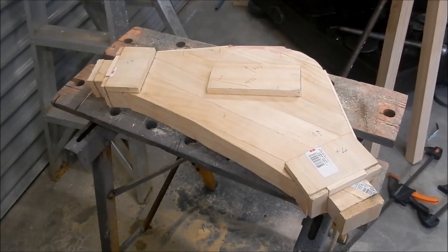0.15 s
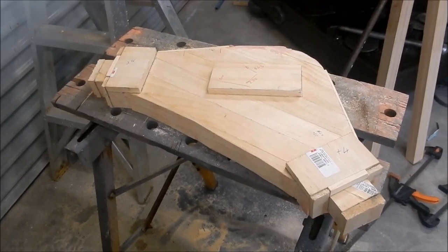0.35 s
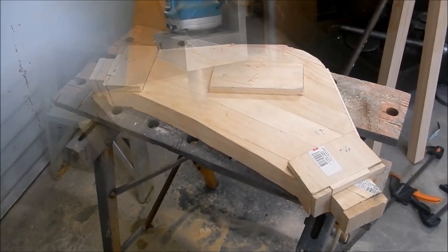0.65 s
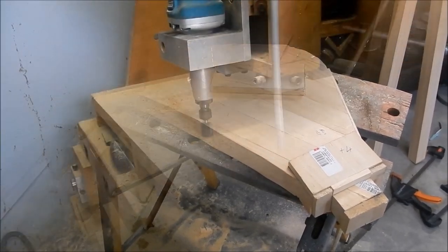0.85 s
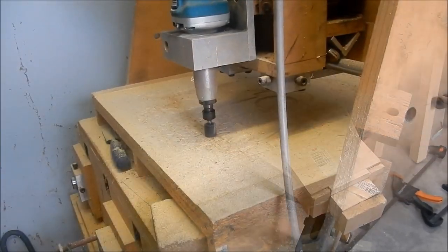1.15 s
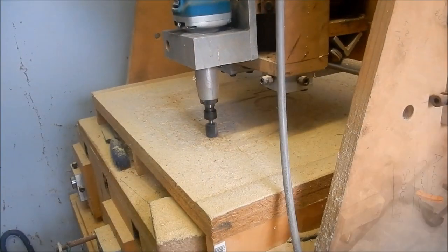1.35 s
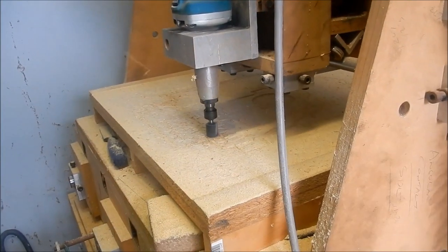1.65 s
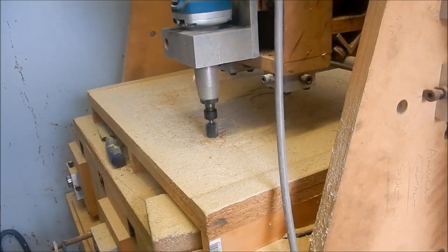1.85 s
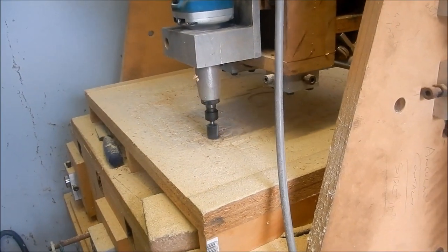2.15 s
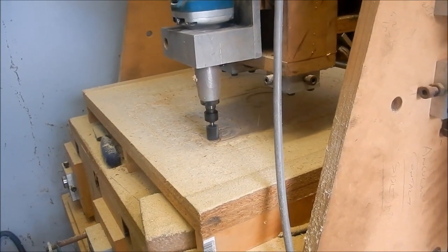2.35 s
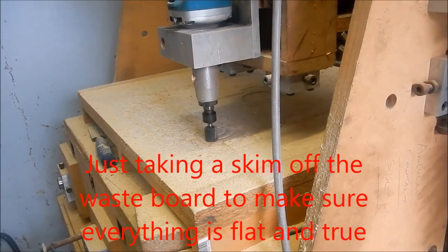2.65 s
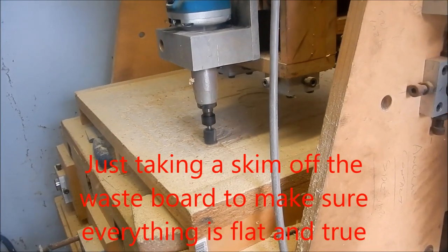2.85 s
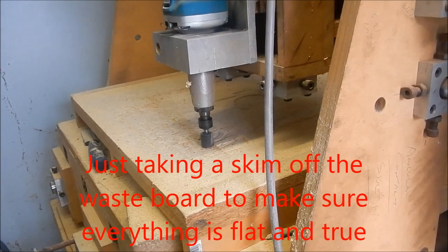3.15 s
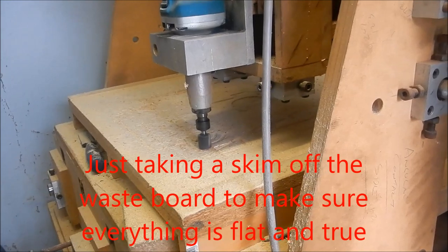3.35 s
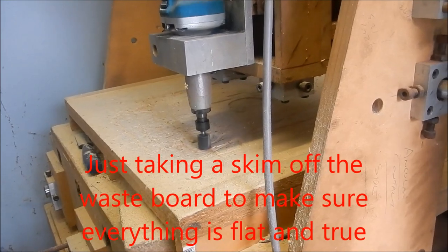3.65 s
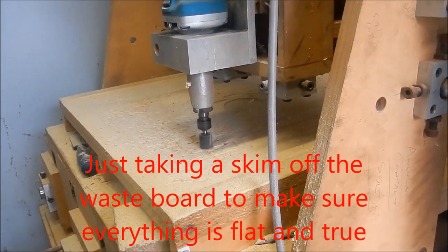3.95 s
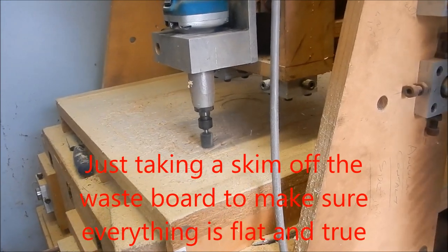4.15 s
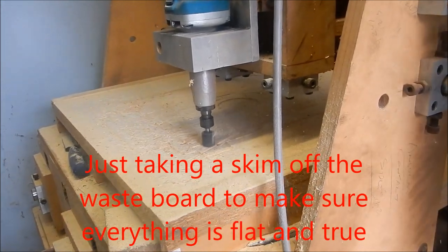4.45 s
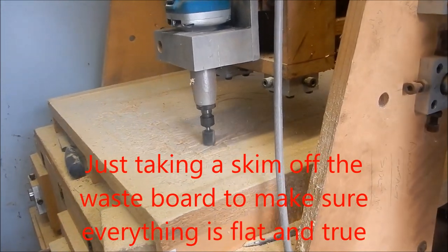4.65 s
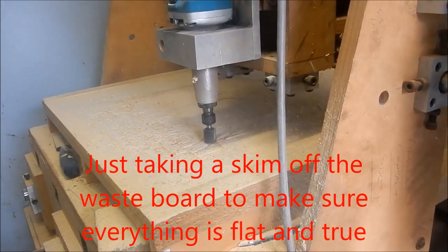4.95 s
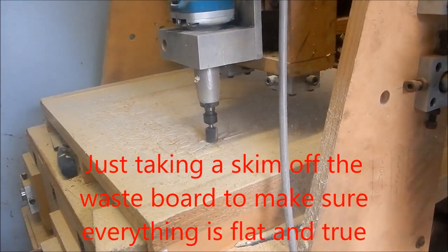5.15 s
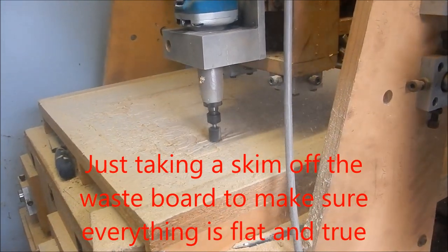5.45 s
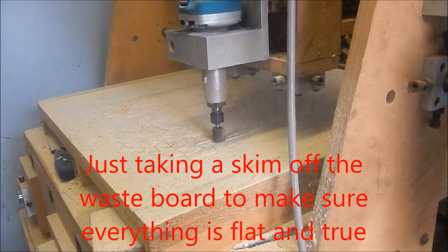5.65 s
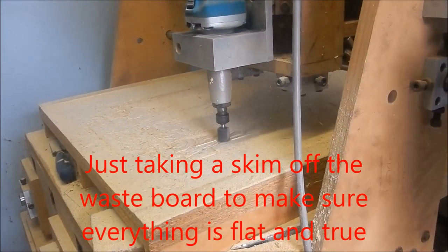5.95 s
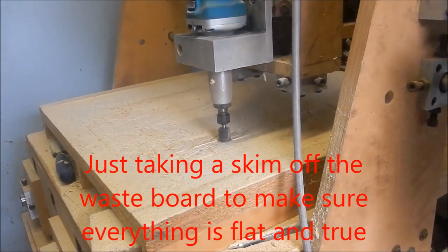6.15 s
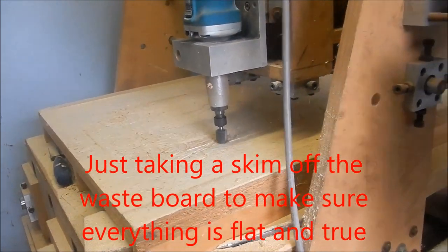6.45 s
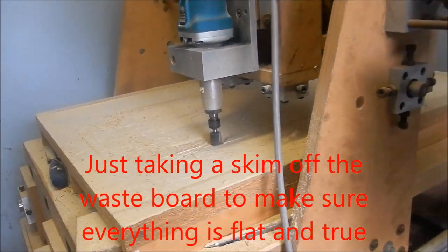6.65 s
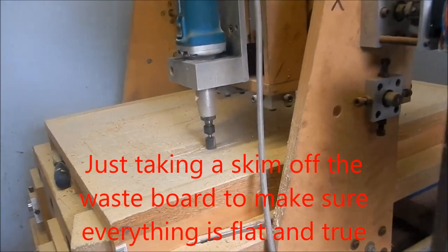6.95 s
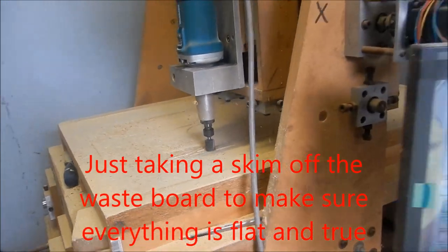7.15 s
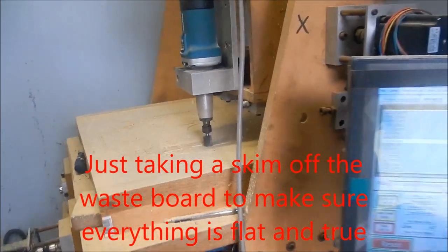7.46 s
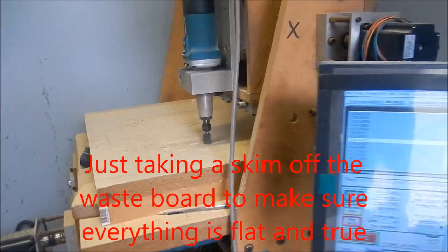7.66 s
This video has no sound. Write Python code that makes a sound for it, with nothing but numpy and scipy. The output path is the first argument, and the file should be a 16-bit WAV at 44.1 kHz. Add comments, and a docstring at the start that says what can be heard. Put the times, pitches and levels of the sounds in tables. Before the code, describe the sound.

Dull workshop noise with a faint whir opens the scene and is gone by about 2 seconds. At about 0.2 seconds a running router cuts in abruptly, close by, and continues to the end. Its bright, high whine holds a nearly constant pitch while the bit skims a wooden board, giving a rasp and a hiss of chips. Many very short squeals flicker at different pitches, thickest and loudest in the first 1.5 seconds; the cut becomes lighter by about 2.5 seconds. Underneath, a lower drone swells, dips and shifts between left and right, with a soft rush from the cooling fan. Around 3.2 to 3.7 seconds the machine's positioning motors faintly glide down and back up with a slight rumble, then leave a quiet hum. The drone swells briefly near 3.7 and 7.7 seconds, and the router is still cutting at the end, near 8 seconds.

```python
"""A trim router on a home-built CNC gantry skims a wooden board in a small workshop. Its two-flute bit whines,
squeals on hard fibres and rasps off chips; imbalance and flute strikes make the board drone, while bearings and
fan run along. Half-way the stepper motors slow down, step over and hum along the next pass. A dull noise with a
faint whir opens the sound and fades out by about 2 s."""
import sys
import numpy as np
from scipy import signal
from scipy.io import wavfile

SR = 44100
rng = np.random.default_rng(int(sys.argv[2]) if len(sys.argv) > 2 else 0)


def transcribe(u):
    """Save the signal u as a 16-bit wav file named by the first command-line argument.

    u: samples, shape (n,) or (channels, n), limited to [-1, 1]; the rate is SR.
    q: integer samples, one column per channel.
    """
    v = np.clip(np.atleast_2d(u).T, -1, 1)
    q = np.round(v * 32767).astype(np.int16)
    wavfile.write(sys.argv[1], SR, q)


N = 344862

# spindle speed, sagging under load: (time [s], speed [turns/s])
SPINDLE_SPEED = [(0.25, 389.5), (1.01, 387.9), (1.24, 391.2), (1.45, 388.2), (1.87, 392.8), (2.31, 387.4),
                 (2.52, 391.9), (2.71, 390.3), (2.84, 385.0), (3.3, 394.0), (3.84, 385.1), (4.16, 388.4),
                 (4.27, 385.3), (5.06, 387.5), (5.19, 390.9), (5.95, 389.8), (6.18, 391.8), (6.41, 388.0),
                 (6.94, 389.4), (7.65, 385.9), (7.74, 382.8), (7.8, 384.4)]
# depth of cut, as a cutting level that drives the layers: (time [s], level [dB])
CUT_DEPTH = [(0.25, -30.5), (0.39, -33.5), (0.44, -34.5), (0.52, -34), (1.22, -37), (1.26, -34),
             (1.55, -34.5), (1.59, -34), (1.64, -35.5), (2.52, -42), (2.69, -43.5), (2.94, -43.5),
             (3.74, -40.5), (5.89, -39.5), (6.5, -41), (6.66, -40), (6.7, -41), (7.8, -41)]
def router(usual_cut_db=-40):
    """Spindle, bit and fan. An order is a multiple of the speed; deep cuts lift chips and bite."""
    speed, = in_time(SPINDLE_SPEED)
    depth_db = in_time(CUT_DEPTH)[0] - usual_cut_db
    turn = angle(speed + .3 * drift(12) + .15 * drift(60))
    hz = np.mean(speed)
    cutting = chips(turn, depth_db)
    low_orders = from_db(-dips_db()) * (drone(turn) + bite(turn, hz, depth_db))
    return cutting + low_orders + whine(turn, hz) + fan() + squeals(turn, hz) + bearings(turn, hz)


# base tone of the whine, set by the even orders: (frequency [Hz], level [dB])
WHINE_SPECTRUM = [(1550, -56.3), (3100, -53), (3900, -56.8), (4650, -55.3), (5450, -56.5), (6200, -57.5),
                  (7000, -58.3), (7800, -58.5), (8550, -59.3), (9400, -61.5), (10100, -61.5),
                  (10900, -63.5), (11700, -63), (13200, -65.3), (14000, -66), (15500, -69)]
# trim on the odd orders: (frequency [Hz], gain [dB])
ODD_ORDER_TRIM = [(2700, -3), (5000, -6), (9000, -9), (13000, -12)]
# treble lift from harder strikes, in full from 7 kHz up: (time [s], gain [dB])
STRIKE_LIFT = [(.25, 9), (.44, 11), (.6, 4), (.72, 7), (.8, 2), (.92, 9.5), (1.05, 8), (1.2, 3), (1.5, 8),
               (1.8, 2), (2.1, 3.5), (2.38, -3), (2.55, 1), (2.78, 2.5), (3.1, -6), (3.5, -3), (4.0, 1.5),
               (4.16, -3), (4.3, 1), (5.0, .5), (5.25, -4), (5.6, 1), (6.2, -5), (6.5, 1), (7.8, 0)]
def whine(turn, hz):
    """Two flutes strike each turn, so even orders lead; their slight mismatch gives the odd ones."""
    lift_db, = in_time(STRIKE_LIFT)
    out = 0
    for k in [4, *range(7, 41)]:
        base_db = at_hz(WHINE_SPECTRUM, k * hz) + at_hz(ODD_ORDER_TRIM, k * hz) * (k % 2)
        level_db = base_db + min(k * hz / 7000, 1) * lift_db
        flutter_db = 2.1 * drift(37)   # uneven fibres roughen each order
        out += from_db(level_db + flutter_db) * tone(k * turn, k * hz, scatter=.67, rate=19)
    return out


# squeal cues: (start [s], order [x speed], length [s], level [dB], pan left minus right [dB])
SQUEAL_CUES = [(.23, 12, .09, -45.5, 2), (.24, 5, .17, -42.5, 1), (.24, 6, .07, -45, 0),
               (.27, 22, .12, -44.5, 5), (.31, 32, .11, -49, 14), (.24, 14, .5, -45, -3),
               (.24, 30, .09, -49, 20), (.33, 14, .04, -43, -2), (.35, 24, .16, -49, -3),
               (.35, 28, .12, -46.5, 15), (.4, 16, .07, -42, -2), (.41, 14, .09, -36, -3),
               (.41, 18, .06, -42.5, 0), (.4, 22, .09, -40, 2), (.5, 5, .1, -45.5, 0),
               (.56, 14, .05, -38, -5), (.56, 16, .06, -45, -2), (.57, 17, .08, -48, 1),
               (.67, 20, .09, -48, 0), (.68, 14, .15, -45, -2), (.68, 24, .06, -49, 4),
               (.64, 26, .1, -50.5, 8), (.72, 3, .08, -45, 0), (.76, 6, .06, -43, 0),
               (.755, 7, .065, -39, 0), (.78, 12, .11, -48, 0), (.88, 26, .09, -47, 5),
               (.89, 16, .06, -44, -1), (.9, 22, .13, -48, 0), (.93, 5, .13, -43.5, 1),
               (.93, 6, .13, -43.5, -1), (.98, 14, .11, -44, -4), (1.02, 16, .07, -45.5, -1),
               (1.2, 14, .09, -45, -1), (1.26, 10, .07, -42.5, -3), (1.3, 5, .22, -44.5, 3),
               (1.3, 6, .2, -45, 0), (1.36, 18, .14, -52, -4), (1.37, 10, .05, -43.5, 1),
               (1.39, 22, .13, -46.5, 4), (1.45, 10, .06, -43.5, 1), (1.46, 14, .12, -47, -2),
               (1.55, 10, .08, -40.5, 0), (1.55, 22, .08, -46, 3), (1.57, 8, .05, -42.5, 2),
               (1.72, 14, .07, -48.5, -4), (1.78, 4, .08, -43, 0), (1.82, 14, .11, -49, -4),
               (1.83, 10, .07, -47, 0), (1.84, 16, .05, -46, -1), (1.93, 4, .05, -47, 0),
               (2.17, 6, .08, -50, 0), (2.21, 5, .09, -44, 2), (2.25, 16, .08, -50, 0),
               (2.6, 8, .1, -49, 1), (2.64, 18, .12, -52, 1), (2.65, 20, .04, -49.5, 0),
               (2.65, 30, .04, -54, 11), (2.66, 6, .1, -46.5, 0), (2.68, 16, .08, -49, -1),
               (2.75, 22, .04, -52, 7), (2.76, 26, .06, -54, 7), (2.76, 30, .07, -55, 11),
               (2.81, 22, .07, -54, 7), (2.82, 16, .08, -52, 0), (2.83, 20, .04, -53, 2),
               (2.83, 5, .11, -47.5, 3), (2.88, 18, .06, -51.5, -1), (2.96, 6, .1, -44, 2),
               (3.14, 26, .3, -59, 6), (3.16, 5, .09, -49, 0), (3.2, 8, .07, -50, 0), (3.22, 3, .1, -52, 4),
               (3.38, 3, .09, -51, 4), (3.45, 5, .13, -49, 1), (3.51, 6, .15, -46.5, 8),
               (3.58, 10, .07, -49, 5), (3.65, 16, .13, -53.5, 1), (3.65, 4, .09, -45.5, 0),
               (3.7, 26, .1, -56, 8), (3.8, 16, .18, -52.5, 0), (3.82, 26, .11, -56, 8),
               (3.88, 14, .13, -52.5, -2), (3.9, 18, .08, -53.5, 1), (4.04, 26, .07, -52.5, 10),
               (4.07, 20, .11, -53.5, 0), (4.1, 6, .11, -50, -1), (4.12, 18, .13, -50.5, 0),
               (4.14, 17, .09, -53.5, -3), (4.22, 26, .12, -55.5, 8), (4.42, 26, .07, -55.5, 7),
               (4.3, 20, .07, -53.5, 1), (4.12, 4, .16, -52, 0), (4.34, 4, .3, -52, 0),
               (4.39, 17, .06, -52.5, -1), (4.4, 20, .1, -51.5, 0), (4.45, 8, .14, -49, -1),
               (4.48, 24, .07, -54.5, 8), (4.53, 6, .1, -49, 1), (4.53, 26, .11, -55.5, 5),
               (4.56, 11, .11, -52, 2), (4.66, 18, .07, -52.5, -2), (4.73, 8, .07, -47, -2),
               (4.91, 8, .16, -44, 0), (5.02, 20, .11, -52, 2), (5.17, 8, .12, -47, 3),
               (5.22, 3, .14, -44.3, 2), (5.27, 5, .1, -45, 2), (5.38, 16, .2, -49.5, -1),
               (5.2, 10, .26, -53, 0), (5.36, 3, .15, -46.5, 2), (5.35, 6, .25, -49.5, 0),
               (5.59, 5, .17, -47.5, 1), (5.64, 10, .15, -50.5, 1), (5.66, 8, .15, -48, 6),
               (5.7, 6, .09, -42.5, 1), (5.84, 5, .11, -47.5, 0), (5.98, 3, .09, -50.5, 2),
               (6, 8, .1, -46, 5), (6, 14, .05, -46, 1), (6.35, 4, .1, -50.5, 0), (6.37, 20, .07, -50.5, 0),
               (6.53, 8, .17, -49, 0), (6.58, 12, .11, -49, -2), (6.59, 4, .1, -48.5, 0),
               (6.61, 14, .08, -51, 1), (6.75, 14, .18, -50.5, 0), (6.86, 6, .14, -44.5, 0),
               (6.89, 5, .13, -45, 0), (7.03, 10, .05, -46, -2), (7.1, 6, .13, -46, 0),
               (7.2, 7, .1, -47, 4), (7.21, 8, .07, -47, 5), (7.31, 4, .08, -49, 2), (7.41, 7, .06, -47, 0),
               (7.42, 6, .06, -45.5, 0), (7.44, 4, .1, -49, 2), (7.55, 14, .1, -49.5, 1),
               (7.59, 7, .08, -47, 0), (7.6, 6, .07, -42, 4), (7.6, 12, .07, -48, 1),
               (7.61, 4, .07, -47, 2), (7.63, 3, .06, -47, 4), (7.68, 10, .07, -47.5, 0),
               (7.72, 6, .1, -43.5, 0)]
def squeals(turn, hz, edge_s=.015, edge_share=.35):
    """The bit meets hard fibres: a single order swells, flutters and lets go."""
    out, t = np.zeros((2, N)), np.arange(N) / SR
    reflections = .22 * (drift(35) + 1j * drift(35)) / np.sqrt(2)
    fibre_flutter = rms_one(from_db(1.4 * drift(60)))
    wavering = fibre_flutter * (1 + reflections)
    for start, order, length, db, pan_db in SQUEAL_CUES:
        fade_s = edge_s + edge_share * length
        ramp = (length / 2 - abs(t - start - length / 2)) / fade_s + .6
        active = ramp > 0
        swell = from_db(db) * np.sin(np.pi / 2 * np.minimum(ramp[active], 1)) ** 2
        phase = order * turn[active] + rng.uniform(0, 2 * np.pi)
        wave = np.exp(1j * phase) * np.roll(wavering, rng.integers(N))[active]
        whistle = stereo(wave.real, wave.imag, order * hz)
        out[:, active] += np.sqrt(2) * swell * panned(whistle, pan_db - at_hz(ROOM_PAN, order * hz))
    return out


# midrange rasp of the cut: (frequency [Hz], relative level [dB])
RASP_EQ = [(350, -14.5), (500, -9), (1000, -7), (1500, -3), (2300, -1.5), (3000, -1), (3800, -7.5),
           (5500, -8.5)]
# bright hiss of the chip spray: (frequency [Hz], relative level [dB])
SPRAY_EQ = [(2800, -2), (4000, -3), (5000, -2.5), (6500, -1.5), (8000, -3.5), (10000, -8.5), (13000, -9),
            (15500, -15.5)]
def chips(turn, depth_db):
    """Chips tear off at each flute, no two the same size, so rasp and spray pulse lightly."""
    pulses = np.exp(.094 * np.cos(turn) + .076 * np.cos(2 * turn))
    bursts = rms_one(pulses * from_db(.4 * drift(120)))
    bursts *= from_db(.22 * drift(6.2))
    rasp = banded_noise(RASP_EQ, flicker_db=1.5, rate=12) + board()
    spray = banded_noise(SPRAY_EQ, flicker_db=1.5, rate=14.4)
    return bursts * (from_db(-43.5 + .69 * depth_db) * rasp + from_db(-43 + .85 * depth_db) * spray)


# wood resonances: (frequency [Hz], bandwidth [Hz], level against the rasp [dB])
BOARD_MODES = [(654, 91, -37), (933, 55, -20), (1273, 69, -15.5), (1710, 33, -14.5), (2100, 280, -9),
               (2860, 250, -20.5)]
def board():
    """Chips keep the board's resonances ringing."""
    out = 0
    for hz, width_hz, db in BOARD_MODES:
        radius = np.exp(-np.pi * width_hz / SR)
        poles = [1, -2 * radius * np.cos(2 * np.pi * hz / SR), radius * radius]
        mid, side = rms_one(signal.lfilter([1, 0, -1], poles, rng.standard_normal((2, N))))
        out += from_db(db) * stereo(mid, side, hz)
    return out


# once-a-turn drone from imbalance: (time [s], level [dB])
IMBALANCE_LEVEL = [(0.25, -46), (1.3, -49.6), (1.39, -48), (2.5, -50), (2.75, -47.6), (2.9, -55),
                   (3.03, -51), (3.64, -48.5), (3.82, -52), (4.73, -44), (7.08, -46), (7.8, -74)]
# standing waves move it sideways: (time [s], pan left minus right [dB])
IMBALANCE_PAN = [(0.25, 13), (0.59, 16), (1.15, -2.5), (2.36, 2.5), (3.55, 15), (5.78, -1), (7.4, 4.5)]
# twice-a-turn drone from the flutes: (time [s], level [dB])
FLUTE_LEVEL = [(0.25, -51), (0.46, -42.5), (0.82, -43.5), (0.88, -45.5), (0.94, -42.5), (1.15, -43.5),
               (1.22, -52.5), (1.66, -41), (1.89, -52), (2.27, -46.5), (2.8, -57.5), (3.0, -47),
               (3.17, -62), (3.43, -62), (3.55, -42), (3.66, -35), (3.74, -45), (3.82, -41), (4.0, -42.5),
               (4.12, -41), (4.77, -40.5), (5.19, -52), (5.86, -47), (6.2, -66), (6.5, -54.5),
               (7.17, -47.5), (7.38, -58.5), (7.7, -36), (7.8, -42.5)]
# standing waves move this one too: (time [s], pan left minus right [dB])
FLUTE_PAN = [(.25, 2), (2.7, 5), (2.88, 22), (3.0, 2.5), (4.77, 0.5), (4.96, -12), (5.17, 2), (6.66, -1.5),
             (6.75, -12), (7.6, 19), (7.76, 2), (7.8, 8)]
def drone(turn):
    """Imbalance and the two flutes shake the board at orders one and two."""
    out = 0
    for order, levels, pans in (1, IMBALANCE_LEVEL, IMBALANCE_PAN), (2, FLUTE_LEVEL, FLUTE_PAN):
        direct = panned(np.sqrt(2) * np.cos(order * turn), in_time(pans)[0])
        scattered = np.array([fading(order * turn, rate=9.8) for channel in "LR"])
        flutter_db = 1.56 * drift(14)   # uneven fibres
        out += from_db(in_time(levels)[0] + flutter_db) * (direct + .21 * scattered)
    return out


# low tones of the flutes biting: (order [x speed], level at the usual depth [dB])
BITE_ORDERS = [(3, -54.5), (5, -52.5), (6, -53)]
def bite(turn, hz, depth_db):
    """Orders three, five and six come and go with the grain of the board."""
    out = 0
    for k, db in BITE_ORDERS:
        grain_db = 3 * drift(3.5)
        out += from_db(db + .32 * depth_db + grain_db) * tone(k * turn, k * hz, scatter=.52, rate=22)
    return out


# brief ducks in drone and bite: (time [s], length [s], depth [dB])
LOW_ORDER_DIPS = [(0.9, .045, 16), (1.22, .08, 6), (2.38, .07, 7), (2.88, .08, 5), (6.42, .12, 4),
                  (6.74, .08, 4)]
def dips_db():
    """Level the low orders lose as they dip and come back."""
    t = np.arange(N) / SR
    return sum(db * bell(t, centre, length) for centre, length, db in LOW_ORDER_DIPS)


# bearing partials: (ratio [x speed], relative level [dB])
BEARING_TONES = [(2.088, 0), (3.07, -4), (4.08, -7), (5.08, -4), (12.28, -6)]
# their shared fader: (time [s], level [dB])
BEARING_FADER = [(.25, -55), (1.3, -59), (1.65, -52), (1.95, -53), (2.55, -57), (2.9, -63), (3.15, -55.5),
                 (3.5, -55.5), (3.6, -60), (5.0, -60), (5.3, -55.5), (6.2, -58), (6.5, -64)]
def bearings(turn, hz):
    """The balls roll at no whole multiple of the speed, so their tones beat against the orders."""
    tones = sum(from_db(db) * tone(k * turn, k * hz, scatter=.3, rate=6) for k, db in BEARING_TONES)
    return from_db(in_time(BEARING_FADER)[0]) * tones


# rush of cooling air: (frequency [Hz], relative level [dB])
FAN_EQ = [(55, -34), (70, -12), (90, -8.5), (135, -11.5), (180, -16), (230, -3), (320, -10.5), (450, 3),
          (800, 4), (1500, -1.5)]
def fan():
    """The router's cooling fan blows a soft, flickering noise."""
    return from_db(-55) * banded_noise(FAN_EQ, flicker_db=2.5, rate=7) * drawing_back()


def steppers(crawl_from_s=3.285, crawl_to_s=3.49, crawl_hz=500, travel_hz=780, resonance_hz=605):
    """Between passes the step rate glides down and up again, ringing the gantry's resonance."""
    t = np.arange(N) / SR
    braking_hz = 1800 * np.maximum(crawl_from_s - t, 0)
    speeding_hz = 1250 * np.maximum(t - crawl_to_s, 0)
    step_hz = np.minimum(crawl_hz + braking_hz + speeding_hz, travel_hz)
    pace = (step_hz - crawl_hz) / (travel_hz - crawl_hz)
    strain = np.sqrt(1 - pace) * np.minimum(.45 + 2 * pace, 1)   # loudest on the ramps
    ring_db = 10.5 * bell(step_hz, resonance_hz, width=70)
    judder_db = 2 * drift(40)
    glide = tone(angle(step_hz), resonance_hz, scatter=1.5, rate=70)
    return strain * from_db(-59.5 + ring_db + judder_db) * glide


# low rumble of the frame: (frequency [Hz], relative level [dB])
FRAME_EQ = [(50, -30), (90, -12), (120, 4), (160, -14), (260, -30)]
def side_step():
    """The step over to the next pass rumbles briefly in the frame."""
    push = from_db(-63) * bell(np.arange(N) / SR, centre=3.41, width=.075)
    return push * banded_noise(FRAME_EQ, flicker_db=2, rate=7)


# hum of the moving gantry: (frequency [Hz], level [dB])
HUM_TONES = [(187, -77), (199.2, -74), (231.5, -72.5), (301.5, -74), (398.4, -61), (430.7, -66.5),
             (463, -70), (570.6, -68)]
def gantry_hum(return_s=3.5):
    """The gantry hums along the return pass, one tone beating against the spindle."""
    t = np.arange(N) / SR
    fade_in = np.clip((t - return_s) * 10, 0, 1)
    hum = sum(from_db(db) * tone(2 * np.pi * hz * t, hz, scatter=.76, rate=7.1) for hz, db in HUM_TONES)
    return fade_in * drawing_back() * hum


# dull opening noise: (frequency [Hz], relative level [dB])
OPENING_EQ = [(25, -18), (55, -5.5), (100, -3.5), (200, -6), (300, -5.5), (450, -8), (850, -9),
              (1150, -13.5), (1600, -12), (2100, -26), (2800, -31), (4000, -29.5), (15000, -44)]
# faint whir within it: (harmonic [x pitch], level before the fades [dB])
WHIR_HARMONICS = [(3, -61), (6, -61.5), (7, -62.5), (8, -69), (9, -71), (10, -75), (11, -74), (12, -74)]
def opening_noise(whir_hz=252, ring_hz=8550, fade_from_s=1.69):
    """Dull noise, a rising, swelling whir and a thin ring sink slowly together, then fade out."""
    t = np.arange(N) / SR
    noise = from_db(-50.5) * banded_noise(OPENING_EQ, flicker_db=1.5, rate=35)
    rise_left = np.exp(-t / .06)
    turn = angle(whir_hz - 26 * rise_left)
    whir = sum(from_db(db) * tone(k * turn, k * whir_hz, scatter=1, rate=25) for k, db in WHIR_HARMONICS)
    ring = from_db(-77) * tone(2 * np.pi * ring_hz * t, ring_hz, scatter=10, rate=150)
    fader = from_db(-2 * t - 125 * np.clip(t - fade_from_s, 0, 1))
    return fader * (noise + from_db(-9 * rise_left) * whir + ring)


def drawing_back(from_s=7.45, db_per_s=30):
    """Fade on fan and gantry hum as the listening point draws back."""
    return from_db(-db_per_s * np.maximum(np.arange(N) / SR - from_s, 0))


# how alike left and right sound: (frequency [Hz], likeness [0-1])
ROOM_LIKENESS = [(50, .89), (150, .9), (500, .93), (2000, .91), (4000, .82), (6500, .64), (9000, .42),
                 (14000, .4)]
# lean of the stereo image: (frequency [Hz], pan left minus right [dB])
ROOM_PAN = [(100, 0), (390, 0.5), (780, 2), (1500, 1.6), (3000, 1), (5500, 1.5), (8000, 0.5), (10000, 8.5),
            (14000, 7)]
def stereo(mid, side, hz):
    """Reflections widen the image towards the treble, where it also leans left."""
    alike = at_hz(ROOM_LIKENESS, hz)
    width = np.sqrt((1 - alike) / (1 + alike))
    return panned(mid + width * side * np.array([[1], [-1]]), at_hz(ROOM_PAN, hz))


def panned(x, pan_db):
    """Left louder than right by pan_db, the middle kept."""
    ratio = np.atleast_1d(from_db(pan_db))
    return x * 2 * np.array([ratio, np.ones_like(ratio)]) / (1 + ratio)


def banded_noise(eq, flicker_db, rate):
    """Stereo noise in 14 bands, each flickering on its own; rms 1 in the middle."""
    edges = np.geomspace(eq[0][0] * .85, min(eq[-1][0] * 1.1, .45 * SR), 15)
    out, white = 0, rng.standard_normal((2, 2, N))
    for k, (low, high) in enumerate(zip(edges, edges[1:])):
        bandpass = signal.butter(2, [low, high], "band", fs=SR, output="sos")
        mid, side = signal.sosfilt(bandpass, white[k % 2])
        hz = np.sqrt(low * high)
        out += stereo(mid, side, hz) * from_db(at_hz(eq, hz) + flicker_db * drift(rate))
    return out / np.std(out.mean(axis=0))


def tone(phase, hz, scatter, rate):
    """A direct tone plus its scattered share, placed in stereo by hz; rms about 1."""
    direct = np.sqrt(2) * np.cos(phase + rng.uniform(0, 2 * np.pi))
    mid = (direct + scatter * fading(phase, rate)) / np.sqrt(1 + scatter ** 2)
    return stereo(mid, fading(phase, rate), hz)


def fading(phase, rate):
    """A tone that arrives over many shifting paths swells and fades."""
    return drift(rate) * np.cos(phase) + drift(rate) * np.sin(phase)


def drift(rate):
    """Smooth random modulation of rms 1, rolling off from about rate [Hz]."""
    hop, settle = 40, 2000
    pole = np.exp(-2 * np.pi * rate * hop / SR)
    white = rng.standard_normal(N // hop + settle + 2)
    slow = signal.lfilter([1], [1, -2 * pole, pole * pole], white)[settle:]
    return np.interp(np.arange(N) / hop, np.arange(len(slow)), rms_one(slow))


def bell(x, centre, width):
    """A swell of height 1, at half power half a width from its centre."""
    return .5 ** np.minimum(2 * ((x - centre) / width) ** 2, 60)


def angle(hz):
    """Running phase of a rate."""
    return 2 * np.pi * np.cumsum(hz) / SR


def in_time(rows):
    """The value columns of an automation curve, sample by sample."""
    times, *columns = np.transpose(rows)
    return [np.interp(np.arange(N) / SR, times, column) for column in columns]


def at_hz(points, hz):
    """Read a curve on a log-frequency axis."""
    frequencies, values = np.transpose(points)
    return np.interp(np.log(hz), np.log(frequencies), values)


def from_db(db):
    """Decibels to gain."""
    return 10 ** (np.asarray(db) / 20)


def rms_one(x):
    """Scale to rms 1."""
    return x / np.sqrt(np.mean(x ** 2) + 1e-20)


def scene(router_in_s=.2325):
    """The router sounds abruptly from 0.23 s on, over the dull noise that opens the scene; the gantry joins
    half-way."""
    running = np.clip((np.arange(N) - router_in_s * SR) / 20, 0, 1)
    return running * router() + steppers() + side_step() + gantry_hum() + opening_noise()


def record(dry, cutoff_hz=15800):
    """A steep low-pass takes off the very top."""
    return signal.sosfilt(signal.ellip(12, .1, 90, cutoff_hz, fs=SR, output="sos"), dry)


dry = scene()
out = record(dry)
transcribe(out)
```